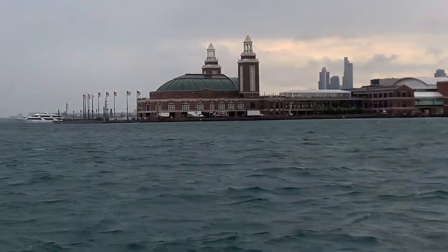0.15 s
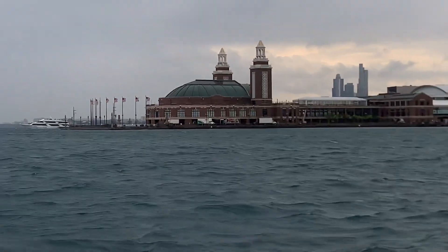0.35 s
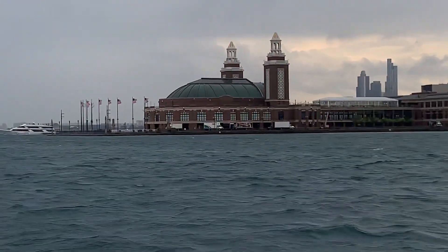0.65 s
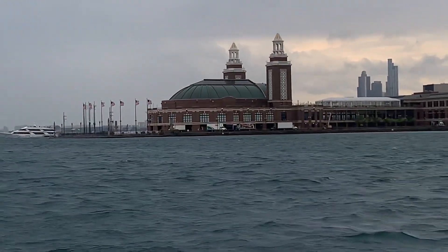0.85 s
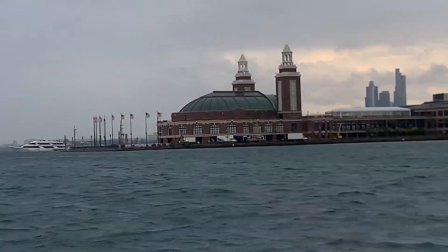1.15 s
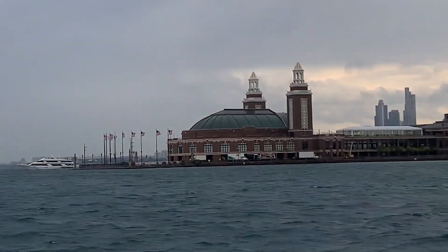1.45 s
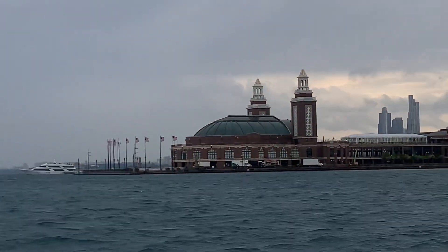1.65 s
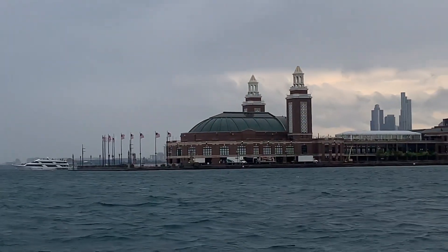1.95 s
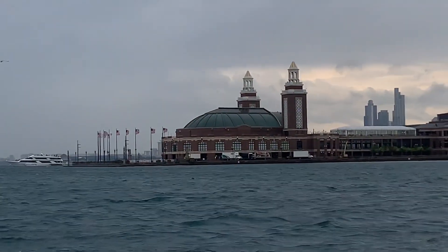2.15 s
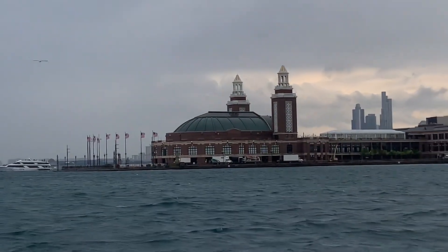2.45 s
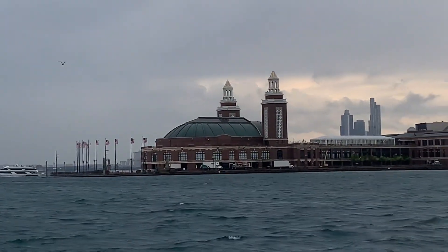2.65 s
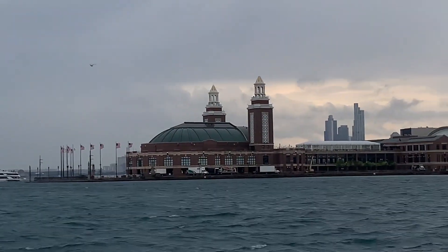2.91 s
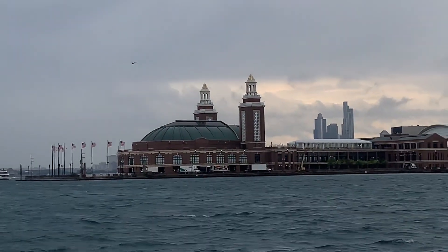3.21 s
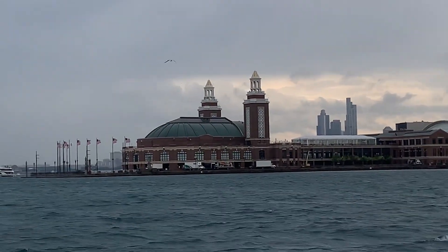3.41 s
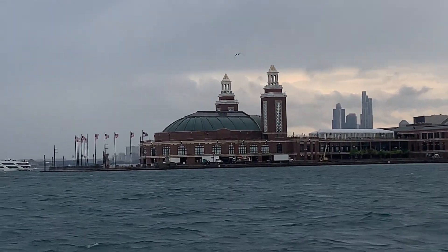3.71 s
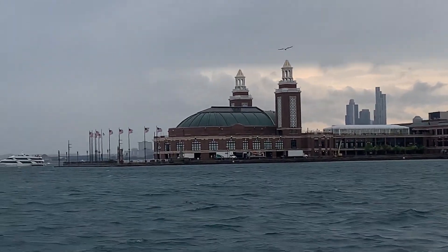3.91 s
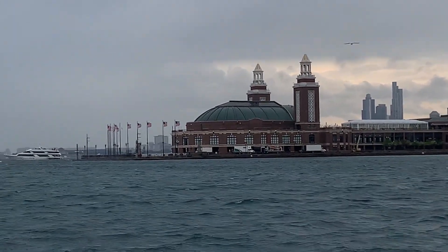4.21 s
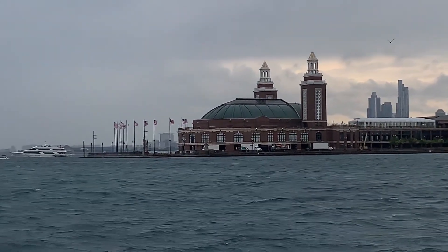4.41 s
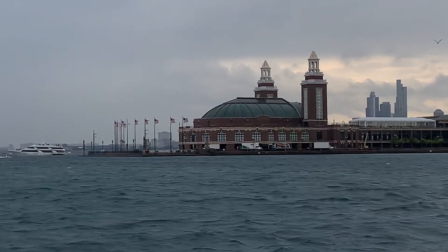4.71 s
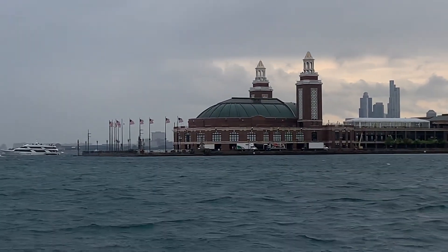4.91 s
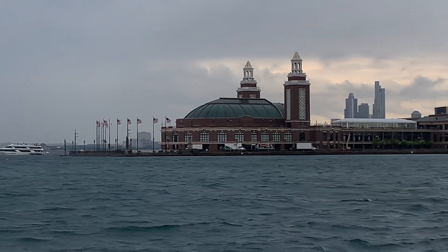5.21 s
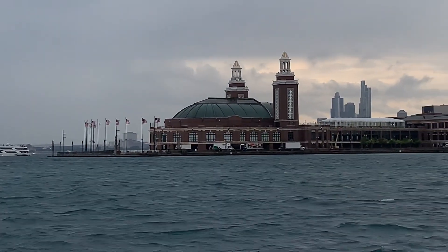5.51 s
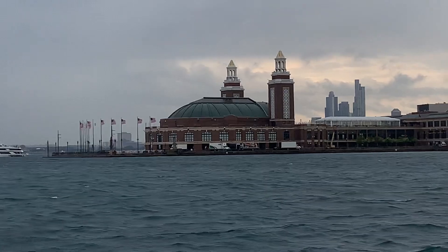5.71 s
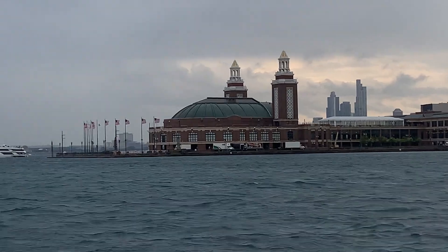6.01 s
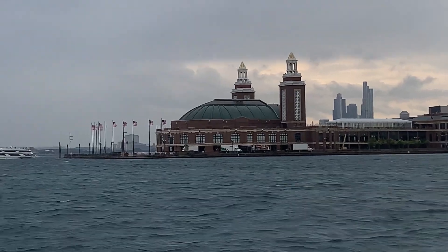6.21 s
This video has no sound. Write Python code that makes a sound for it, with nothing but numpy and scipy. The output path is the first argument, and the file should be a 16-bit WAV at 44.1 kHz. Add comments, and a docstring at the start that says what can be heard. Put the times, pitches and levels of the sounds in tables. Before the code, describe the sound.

Wind blows across the microphone on the open deck of a moving boat, making a deep, continuous rumble. From the start until about 2.6 seconds it buffets hard, with rapid low thumps and rasping flutters, strongest around 1.2 seconds. Another gust hits near 3.2 seconds, then the wind eases to scattered knocks before a last cluster of buffets from about 5.7 to 6 seconds. Behind the wind, the hull churns a steady, gently sloshing wash through choppy water. Small waves break in soft surges of hissing spray and fine droplets, around 1.4 and 2.2 seconds and most clearly between 5 and 5.7 seconds. The engine drones low underneath the whole time. A faint, slightly wavering mid-pitched whine from the drive comes forward at about 3 seconds, dips briefly, and is clearest from 5 seconds to the end, a little past 6 seconds.

```python
"""Wind rumbles and thumps on a two-port microphone on the open deck of a moving boat.
Eddies, hardest at first, flutter at the port edges, thump, and shove the microphone with deep pressure.
Behind them the hull churns a wash through choppy water, and breaking waves throw hissing spray.
Underneath, the engine drones; the faint whine of its drive comes forward as the wind eases."""
import sys
import numpy as np
from scipy import signal
from scipy.fft import rfft, irfft, next_fast_len
from scipy.io import wavfile
from scipy.ndimage import uniform_filter1d, minimum_filter1d

SR = 44100
rng = np.random.default_rng(int(sys.argv[2]) if len(sys.argv) > 2 else 0)


def unload_audio(sound):
    """Save the sound as a 16-bit wav file, at the path given as the first command line argument."""
    columns = np.transpose(np.atleast_2d(sound))
    # keep every value between -1 and 1, then stretch to whole-number steps
    steps = np.round(np.clip(columns, -1, 1) * 32767)
    wavfile.write(sys.argv[1], SR, steps.astype(np.int16))


N = 280254
FFT_SIZE = next_fast_len(N)
TIME_S, FREQ_HZ = np.arange(N) / SR, np.fft.rfftfreq(FFT_SIZE, 1 / SR)


def gain_of(db):
    """Decibels to amplitude."""
    return 10 ** (np.asarray(db) / 20)


def unit_rms(x):
    """Scales to an rms of one."""
    return x / np.sqrt(np.mean(x ** 2) + 1e-20)


def at_hz(table, hz=FREQ_HZ):
    """Interpolates a table over log frequency."""
    table_hz, values = np.transpose(table)
    return np.interp(np.log(hz + 1), np.log(table_hz + 1), values)


def at_time(table, t_s=TIME_S):
    """Interpolates a table over time."""
    return np.interp(t_s, *np.transpose(table))


def shaped(x, gain):
    """Filters by a gain at each frequency."""
    return irfft(rfft(x, FFT_SIZE) * gain, FFT_SIZE)[:N]


def noise(gain):
    """Unit-rms noise with the given amplitude spectrum."""
    return unit_rms(shaped(rng.standard_normal(N), gain))


def drift(rate_hz):
    """Unit-rms random wander up to about rate_hz."""
    return noise(np.exp(-(FREQ_HZ / rate_hz) ** 2))


def steadied(x, span_s):
    """Divides out swells slower than span_s."""
    size = max(int(span_s * SR), 3)
    power = uniform_filter1d(uniform_filter1d(x ** 2, size), size)
    return x / np.sqrt(abs(power) + 1e-6)


def add_centred(mix, t_s, sound):
    """Adds a sound to the mix, centred on t_s."""
    start = round(t_s * SR) - len(sound) // 2
    sound = sound[max(-start, 0):]
    part = mix[max(start, 0):][:len(sound)]
    part += sound[:len(part)]


def ports(mid, side, side_spectrum):
    """Left and right port: lows cover both alike, highs differ by side_spectrum."""
    side = shaped(side, gain_of(at_hz(side_spectrum)))
    return np.array([mid + side, mid - side])


# Steady wind strength: t/s, relative level/dB
WIND_STRENGTH = [(0, -31.5), (.6, -32), (.7, -31.5), (.83, -32.5), (.95, -31.5), (1.15, -30), (1.42, -34),
                 (1.7, -35.5), (1.95, -32.5), (2.2, -37), (2.9, -37.5), (3.12, -36.5), (3.25, -32),
                 (3.4, -34.5), (3.65, -36), (4.02, -35), (4.3, -38), (4.7, -38), (5.2, -37.5),
                 (5.62, -41.5), (5.76, -35), (5.88, -35.5), (6.02, -32.5), (6.14, -41.5), (6.35, -40)]
# Wind spectra: f/Hz, relative level/dB
RUMBLE_SPECTRUM = [(10, -1), (22, -15.5), (32, -4), (48, -3), (65, -3.5), (100, -4.5), (140, -11),
                   (250, -26.5), (600, -81)]
BLUSTER_SPECTRUM = [(50, -16), (120, 5.5), (220, -6.5), (400, -9.5), (800, -30.5), (1500, -25), (3000, -39),
                    (6000, -88)]
# Hollow ring of wind between the ports: f/Hz, side gain/dB
WIND_SIDE = [(120, -78), (400, -57), (600, -29.5), (770, -5.5), (900, -8), (1080, 2.5), (1400, -5.5),
             (1750, -1)]

def wind(rumble_trim_db=1.5, bluster_db=-42, usual_wind_db=-35.5, bluster_growth=1.4):
    """Pressure swings on the microphone body: deep rumble, and bluster that grows faster with the wind."""
    strength_db = at_time(WIND_STRENGTH) + 1.24 * drift(rate_hz=14)
    rumble = steadied(noise(gain_of(at_hz(RUMBLE_SPECTRUM))), span_s=0.078)
    bursts = rng.standard_normal((2, N)) * gain_of(4 * drift(rate_hz=130))
    colour = gain_of(at_hz(BLUSTER_SPECTRUM))
    mid, side = (steadied(unit_rms(shaped(x, colour)), span_s=0.052) for x in bursts)
    bluster_gain = gain_of(bluster_db + bluster_growth * (strength_db - usual_wind_db))
    return rumble * gain_of(strength_db + rumble_trim_db) + ports(mid, side, WIND_SIDE) * bluster_gain


# Likeness of the water at the two ports: f/Hz, coherence/0-1
WATER_COHERENCE = [(850, .999), (1000, 0), (1150, 0.6), (1400, 0.7), (1800, 0.3), (2200, 0), (3000, 0.37),
                   (5500, 0.35), (7200, 0.22), (8200, 0.96), (15000, 0.94)]
# Water sound bends round from the right to the left port: f/Hz, lag/cycles
PORT_LAG = [(1600, 0), (2700, .5), (4200, 1), (5400, 1.5), (6600, 2), (8600, 2.5), (11000, 3), (13400, 3.5),
            (15800, 4)]
# Water balance: f/Hz, left minus right/dB
WATER_BALANCE = [(800, -1), (2200, -0.1), (4000, -1), (5800, -2.8), (7200, -2), (8500, 0)]
# Water difference between the ports: f/Hz, side gain/dB
WATER_SIDE = [(400, -50), (850, -14), (950, -17), (1100, 2.5), (1350, -0.5), (1600, -2.5), (2000, 0)]

def water_noise(spectrum, patchy_db, flicker_db):
    """Splashing noise, patchy in time and frequency, reaching the ports from the right."""
    def smoothed(x, frames, bins):
        """Unit-rms blur over time and frequency."""
        return unit_rms(uniform_filter1d(uniform_filter1d(x, frames, axis=0), bins, axis=1))
    hz = np.fft.rfftfreq(512, 1 / SR)
    left_re, left_im, own_re, own_im, patches, flicker = rng.standard_normal((6, N // 128 + 5, len(hz)))
    level_db = at_hz(spectrum, hz) + patchy_db * smoothed(patches, frames=14, bins=4)
    level_db += flicker_db * smoothed(flicker, frames=3, bins=40)
    coherence = np.clip(at_hz(WATER_COHERENCE, hz), 0, 1)
    left = left_re + 1j * left_im
    right = coherence * left + np.sqrt(1 - coherence ** 2) * (own_re + 1j * own_im)
    right *= np.exp(2j * np.pi * at_hz(PORT_LAG, hz))
    balance = gain_of(at_hz(WATER_BALANCE, hz) / 2)
    spectra = np.array([left * balance, right / balance]) * gain_of(level_db)
    _, splashing = signal.istft(spectra.swapaxes(1, 2), nperseg=512, noverlap=384)
    left, right = unit_rms(splashing[:, :N])
    return ports((left + right) / 2, (left - right) / 2, WATER_SIDE)


# Churning water: f/Hz, relative level/dB
WASH_SPECTRUM = [(80, -1), (250, -1.5), (430, -2), (600, -2), (850, -3.5), (1050, -3.5), (1350, -8),
                 (1650, -8.5), (2000, -12), (2800, -16), (5000, -23.5), (15000, -32.5)]
# How openly wash and engine are heard: t/s, wash gain/dB
OPENNESS = [(0, -1.5), (1.8, -1), (2.8, -1), (3.3, 1.5), (3.7, 0), (4.2, 1), (4.55, 1), (4.8, 0.5),
            (5.25, 1), (5.6, 1), (6.35, 2)]

def wash(level_db=-43, slosh_db=0.7):
    """The hull churns a steady, gently sloshing wash."""
    churn = water_noise(WASH_SPECTRUM, patchy_db=2.5, flicker_db=1.5)
    return churn * gain_of(level_db + at_time(OPENNESS) + slosh_db * drift(rate_hz=4))


def noise_bands(bands):
    """Sum of steady noise bands, one a row."""
    return sum(gain_of(db) * steadied(noise(1 / (1 + (2 * (FREQ_HZ - hz) / width_hz) ** 2)), span_s=0.29)
               for hz, width_hz, db in bands)


# Engine hum and drones: f/Hz, width/Hz, relative level/dB
ENGINE_BANDS = [(60, 17, -43.5), (149, 230, -52.5), (246, 116, -48.5), (528, 180, -52)]

def engine(trim_db=-2, openness_scale=3.06):
    """The engine drones in broad low bands that swell with the wash."""
    return noise_bands(ENGINE_BANDS) * gain_of(trim_db + openness_scale * at_time(OPENNESS))


# Faint lines of the drive: f/Hz, width/Hz, relative level/dB
WHINE_BANDS = [(594, 5.9, -64), (719, 35, -52), (816, 63, -51), (870, 25, -55), (942, 11, -57),
               (1005, 67, -54.5), (1075, 13, -58), (1655, 23, -59.5)]
# Rise of the whine: t/s, relative level/dB
WHINE_LEVEL = [(0, -18), (2.2, -9.5), (3.1, -1), (4.05, -6), (4.5, -2), (5.3, 1), (5.8, 1), (6.35, -0.5)]

def drive_whine(tone_hz=785.3, waver_hz=0.99, throb_db=0.8, trim_db=-2):
    """The drive sings one clear, wavering tone among fainter lines."""
    cycles = np.cumsum(tone_hz + waver_hz * drift(rate_hz=1.38)) / SR
    tone = unit_rms(np.sin(2 * np.pi * cycles)) * gain_of(-48.5 + throb_db * drift(rate_hz=7))
    return (tone + noise_bands(WHINE_BANDS)) * gain_of(trim_db + at_time(WHINE_LEVEL))


# Eddy strikes: peak t/s, length/s, relative level/dB, push offset/dB, rasp offset/dB, rasp f/Hz
LARGE_EDDIES = [(.022, 0.031, -31.5, -3, -3.5, 890), (.085, 0.021, -35, 6, -15, 700),
                (.11, 0.013, -33.5, 9, -7, 800), (.144, 0.0084, -24, -6, -6.5, 550),
                (.162, 0.0068, -33.5, 6, 6, 800), (.188, 0.0074, -25, 6, -3, 560),
                (.225, 0.0092, -35, -8, -2, 650), (.256, 0.052, -35, -9, -3, 690),
                (.32, 0.034, -32.5, 8.5, -6, 800), (.363, 0.016, -28, 7, -7, 1030),
                (.42, 0.048, -30, 2, -6.5, 750), (.477, 0.023, -34, 3, -2.5, 650),
                (.53, 0.012, -28, -4, -6.5, 600), (.578, 0.047, -30, 0, -8, 790),
                (.619, 0.019, -25, 6, -7.5, 750), (.68, .024, -36, 4, -5, 650),
                (.742, 0.023, -30, 5, -19, 650), (.789, 0.018, -30, 5.5, -12, 650),
                (.881, 0.014, -25.5, -3, -6.5, 735), (.915, 0.015, -26, -3, -5.5, 540),
                (.944, 0.0056, -32, 6, 3, 910), (.965, 0.0098, -32, 11, -4, 700),
                (1.026, 0.022, -34.5, 10, -1, 1210), (1.065, 0.015, -30.5, 4, -2, 1100),
                (1.083, 0.021, -31.5, 7, -2.5, 1350), (1.118, 0.026, -30.5, 7, -7, 804),
                (1.16, 0.033, -26, 1, -10, 1220), (1.181, 0.032, -35, -2, 4, 690),
                (1.216, 0.016, -21, -4, -9, 1320), (1.255, 0.021, -27.5, 0, -17, 700),
                (1.323, 0.024, -27, 4, -7, 945), (1.385, 0.017, -30.5, 3, -9, 1100),
                (1.461, 0.023, -26.5, 2, -2.5, 1380), (1.531, 0.019, -25.5, 2.5, -13, 750),
                (1.585, 0.018, -26, -10, -8.5, 1180), (1.635, 0.025, -30, 3, -9, 960),
                (1.662, 0.013, -30, 8, -10, 700), (1.69, .024, -35, -2, -22, 700),
                (1.728, 0.02, -43, 15, -17, 700), (1.768, 0.019, -32.5, 3, -6, 1300),
                (1.792, 0.011, -27.5, -4, -12, 700), (1.853, 0.029, -27.5, -10, -9, 1380),
                (1.873, 0.029, -33, -9, -0.5, 682), (1.918, 0.008, -28.5, -8, -5, 590),
                (1.941, 0.015, -27, 5.5, -7, 634), (1.982, 0.037, -31.5, 8.5, -12.5, 600),
                (2.101, 0.014, -33.5, 6, -1.5, 800), (2.245, 0.011, -26, 5.5, -11.5, 750),
                (2.366, 0.0093, -29.5, 1, -21, 650), (2.418, 0.016, -29.5, -2, -14, 650),
                (2.442, 0.012, -29, 1, -6, 900), (2.486, 0.011, -30, 11, -2, 800),
                (2.508, 0.012, -31.5, 4, -10, 700), (2.532, 0.026, -25.5, -8, -16, 604),
                (2.572, 0.018, -24, -5, -9.5, 790), (2.79, 0.054, -33.5, -3, -25, 600),
                (2.847, 0.0063, -32.5, 2, 1.5, 780), (2.866, 0.01, -33.5, 4, -23, 650),
                (2.957, 0.014, -47.5, -6, 15.5, 1070), (3.142, 0.0066, -35, 5, 4, 850),
                (3.209, 0.016, -25.5, -12, -19.5, 1010), (3.259, 0.011, -26, 8, -24, 700),
                (3.31, 0.0096, -29, 1, -8, 800), (3.357, 0.012, -42, 12, -14, 700),
                (3.765, 0.053, -33, 7, -22, 700), (3.98, 0.011, -37, 7, -9, 750),
                (4.002, 0.03, -31, 2, -31, 696), (4.205, 0.014, -47.5, 17.5, -16, 700),
                (4.285, .014, -33.5, 5, -16, 700), (4.48, 0.015, -33, 5, -7, 1000),
                (4.944, 0.015, -32.5, 4.5, -3, 750), (5.372, 0.02, -33.5, -2, -21, 704),
                (5.722, 0.029, -36, 13, -22, 700), (5.778, 0.024, -32, -2, -17, 815),
                (5.862, 0.047, -29.5, -1, -13, 650), (5.9, 0.028, -31, 7.5, -12, 700),
                (5.978, 0.035, -43.5, 14.5, -8, 700), (6.315, 0.015, -38, 8, -4, 750)]

def eddy_strikes(small_per_s=5, mean_length_s=0.018, push_db=-5, rasp_hz=784):
    """Rows of eddies that strike the microphone: the large ones, plus small ones scaled to the wind."""
    eddies = list(LARGE_EDDIES)
    for _ in range(int(small_per_s * N / SR)):
        t_s = rng.uniform(0, N / SR)
        db = at_time(WIND_STRENGTH, t_s) - rng.uniform(5, 9)
        length_s = mean_length_s * rng.uniform(0.5, 1.5)
        rasp_db = -rng.uniform(4, 8)
        eddies.append((t_s, length_s, db, push_db, rasp_db, rasp_hz))
    return eddies


PUFF_SIZE = 8192
PUFF_HZ = np.fft.rfftfreq(PUFF_SIZE, 1 / SR)

def puff(length_s, colour, ragged, swirl_s, front, steady_s):
    """A puff of turbulence: uneven, coloured swirls with a steep front and a longer wake."""
    def blurred(x, span_s):
        """Gaussian smoothing."""
        return irfft(rfft(x) * np.exp(-(PUFF_HZ * span_s) ** 2))
    t_s = (np.arange(PUFF_SIZE) - PUFF_SIZE // 2) / SR
    width_s = length_s * np.where(t_s < 0, front, 2 - front)
    swell = np.exp(-2 * (t_s / width_s) ** 2)
    air = unit_rms(irfft(rfft(rng.standard_normal(PUFF_SIZE)) * colour))
    air /= np.sqrt(abs(blurred(air ** 2, steady_s)) + 1e-6)
    swirls = np.exp(ragged * unit_rms(blurred(rng.standard_normal(PUFF_SIZE), swirl_s)))
    return unit_rms(air * swell * swirls) * np.sqrt(np.mean(swell ** 2))


def flutters(eddies, trim_db=-4.5, lead_s=0.003014, q=1.75, top_ratio=1.4):
    """The finest swirls arrive first and rasp at the port edges: slow eddies knock, fast ones crack."""
    mid, side = np.zeros((2, N))
    for t_s, length_s, db, _, rasp_db, rasp_hz in eddies:
        ratio = (PUFF_HZ + 1) / rasp_hz
        colour = 1 / np.hypot(1, q * (ratio - 1 / ratio)) / np.hypot(1, (ratio / top_ratio) ** 3.2)
        for channel in (mid, side):
            rasp = puff(length_s, colour, ragged=0.28, swirl_s=0.0021, front=0.72, steady_s=0.012)
            add_centred(channel, t_s - lead_s, gain_of(db + rasp_db + trim_db) * rasp)
    return ports(mid, side, WIND_SIDE)


def thumps(eddies, trim_db=1.5, low_hz=110, top_hz=1500, usual_rasp_db=-5, octaves_per_db=0.04):
    """Each eddy thumps up to its own corner frequency; faster ones rasp more and reach higher."""
    mid, side = np.zeros((2, N))
    band = PUFF_HZ ** 2 / (PUFF_HZ ** 2 + low_hz ** 2) / np.hypot(1, (PUFF_HZ / top_hz) ** 3)
    for t_s, length_s, db, _, rasp_db, _ in eddies:
        corner_hz = 198 * 2 ** (octaves_per_db * (rasp_db - usual_rasp_db))
        colour = band / np.hypot(1, (PUFF_HZ / corner_hz) ** 2.25)
        for channel in (mid, side):
            thump = puff(length_s, colour, ragged=0.33, swirl_s=0.0063, front=0.68, steady_s=0.044)
            add_centred(channel, t_s, gain_of(db + trim_db) * thump)
    return ports(mid, side, WIND_SIDE)


def pushes(eddies, trim_db=1, lag_s=0.0064, swing_hz=78, spread_octaves=0.4975, sag_octaves_per_s=13):
    """Each eddy's core shoves the microphone: a deep pressure swing that slows as it passes."""
    mix = np.zeros(N)
    local_s = np.arange(-SR // 12, SR // 12) / SR
    for t_s, length_s, db, push_db, _, _ in eddies:
        hz = swing_hz * 2 ** (spread_octaves * rng.uniform(-1, 1) - sag_octaves_per_s * local_s)
        swing = np.sin(2 * np.pi * (np.cumsum(hz) / SR + rng.random()))
        width_s = (0.007 + 0.3 * length_s) * np.where(local_s < 0, 0.73, 1)
        swell = np.exp(-0.5 * (local_s / width_s) ** 2)
        add_centred(mix, t_s + lag_s, gain_of(db + push_db + trim_db) * swell * swing)
    return mix


# Spray and droplets: f/Hz, relative level/dB
SPRAY_SPECTRUM = [(300, 7), (600, 6.5), (1100, 5), (1700, 7.5), (2700, 2), (4200, 2.5), (6000, 0),
                  (8500, -2.5), (11000, -5), (13500, -9), (15500, -12.5)]

def droplets(per_s=900, spread_db=0.5):
    """Spray falls back as a patter of tiny ticks."""
    sizes = rng.choice([-1, 1], N) * gain_of(spread_db * np.minimum(rng.exponential(1, N), 5))
    ticks = sizes * (rng.random(N) < per_s / SR)
    left = unit_rms(shaped(ticks, gain_of(at_hz(SPRAY_SPECTRUM))))
    right = shaped(left, np.exp(2j * np.pi * at_hz(PORT_LAG)))
    return np.array([left, right])


# Waves along the hull: crest t/s, relative level/dB, fall time/s
WAVES = [(0.277, -55.5, 0.099), (0.927, -50.5, 0.12), (1.394, -49.5, 0.23), (2.167, -48.5, 0.14),
         (3.07, -56.5, 0.089), (3.552, -55, 0.44), (4.008, -50.5, 0.1), (4.424, -50, 0.18),
         (5.18, -45.5, 0.18), (5.35, -47, 0.16), (5.693, -48, 0.13), (6.033, -51.5, 0.17)]

def breaking_waves(floor_db=-60, rise_over_fall=0.97, spray_trim_db=3.5, droplet_trim_db=-6):
    """Each breaking wave throws up a surge of spray and droplets; a faint fizz lasts between them."""
    power = np.full(N, gain_of(floor_db) ** 2)
    for crest_s, db, fall_s in WAVES:
        width_s = fall_s * np.where(TIME_S < crest_s, rise_over_fall, 1)
        power += gain_of(db) ** 2 * np.exp(-((TIME_S - crest_s) / width_s) ** 2)
    spray = water_noise(SPRAY_SPECTRUM, patchy_db=2, flicker_db=1) * gain_of(spray_trim_db)
    return (spray + droplets() * gain_of(droplet_trim_db)) * np.sqrt(power)


def scene():
    """Low wind and engine are common to both ports; water and flutter spread out."""
    boat = wash() + breaking_waves() + drive_whine() + engine()
    eddies = eddy_strikes()
    return boat + wind() + pushes(eddies) + thumps(eddies) + flutters(eddies)


def record(dry, ceiling_db=-15.5, cutoff_hz=15750):
    """A fast limiter holds down the hardest buffets; a low-pass follows."""
    allowed_gain = np.minimum(1, gain_of(ceiling_db) / (abs(dry).max(axis=0) + 1e-9))
    limited = dry * uniform_filter1d(minimum_filter1d(allowed_gain, size=200), size=200)
    lowpass = signal.firwin(511, cutoff_hz, window=("kaiser", 9), fs=SR)
    return signal.oaconvolve(limited, lowpass[None], "same")


dry = scene()
out = record(dry)
unload_audio(out)
```